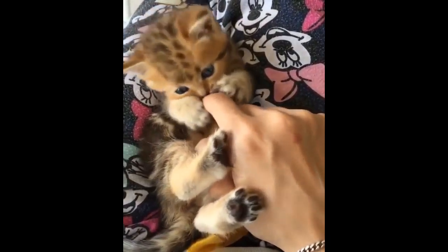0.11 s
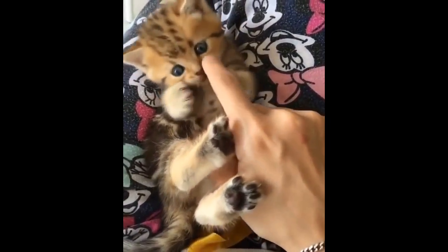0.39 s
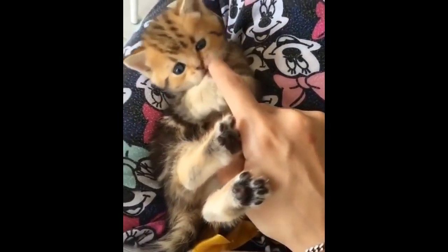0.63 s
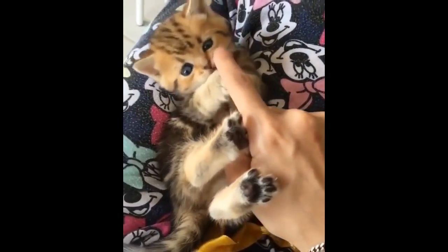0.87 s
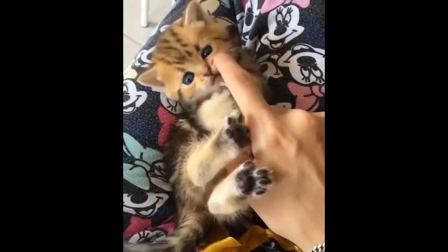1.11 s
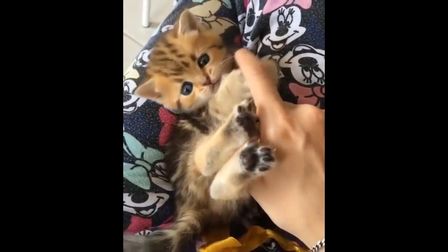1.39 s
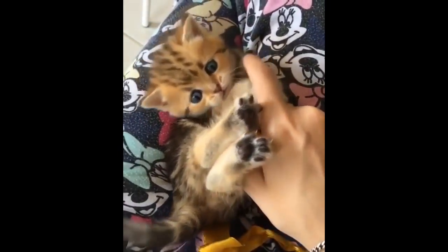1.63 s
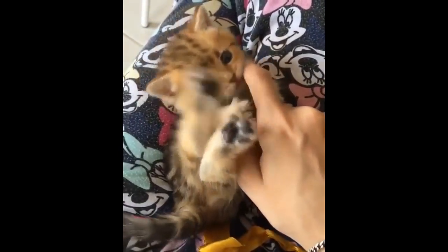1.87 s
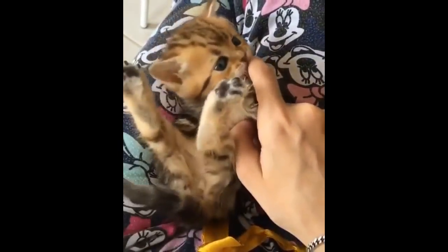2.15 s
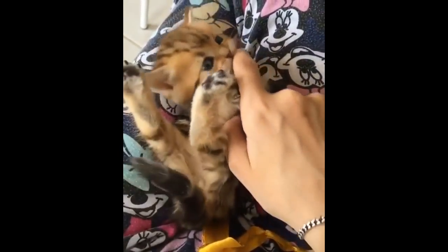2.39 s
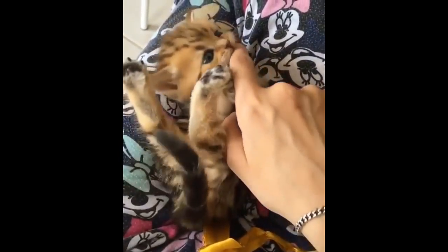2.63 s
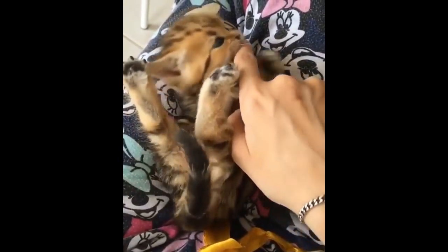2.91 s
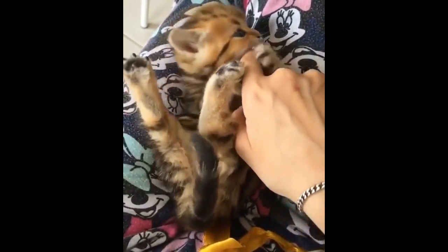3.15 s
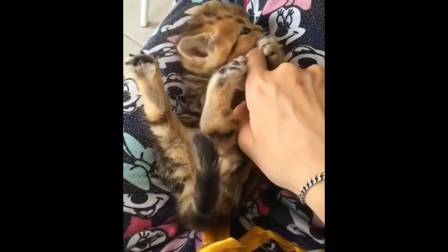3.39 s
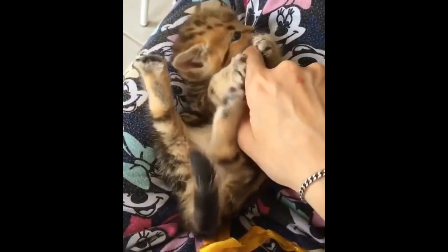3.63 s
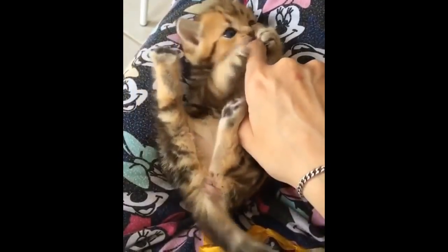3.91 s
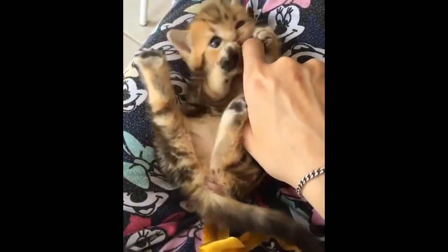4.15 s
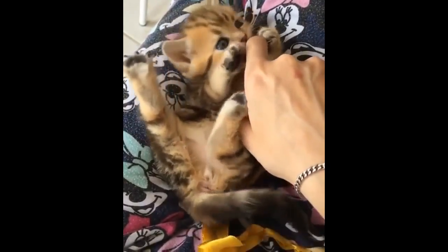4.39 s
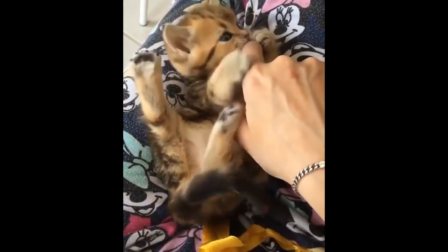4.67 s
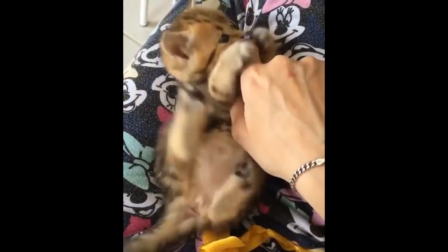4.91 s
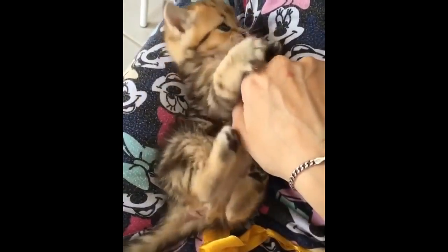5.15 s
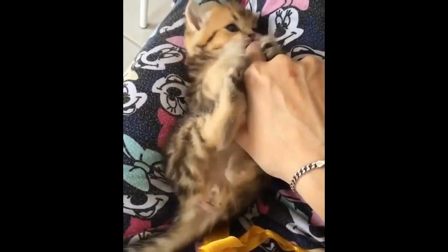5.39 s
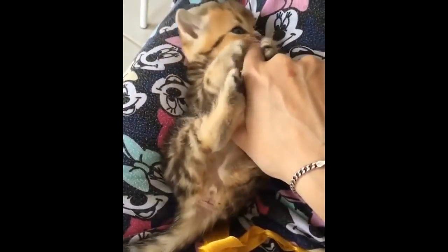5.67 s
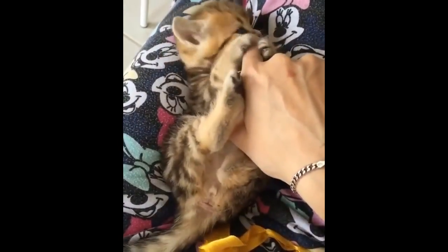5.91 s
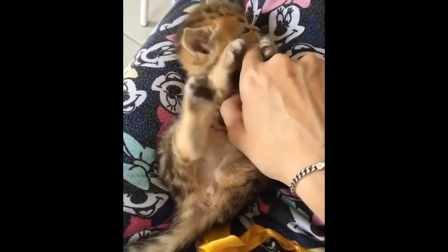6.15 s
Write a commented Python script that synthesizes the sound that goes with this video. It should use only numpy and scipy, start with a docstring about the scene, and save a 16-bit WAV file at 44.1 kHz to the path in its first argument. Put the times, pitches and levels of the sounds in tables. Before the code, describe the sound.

A dark, bassy drone wavers continuously, almost like a rough purr, with uneven pulses and a soft rumble coloured by the room. Quiet hiss sits behind. Early on come two small claw clicks, then a sharper tick near 2.4 seconds and a duller scratch near 3.3, with soft fur rubs around them. Later only gentle brushing and a slightly growing motor whine remain. Indoor, mono, dull at the very top.

```python
"""Kitten on a lap, appliance drone

A kitten plays in a quiet room; what is heard is mostly the low drone of an appliance with a fan.
Narrow bands of low hum noise, each drawn as a sine of irregular level and pitch, lie beside lines on
multiples of the mains; the rumble is noise through the room's standing waves. Air is faint noise; fur
is clumped noise brushing on cloth, and claws now and then tick as snaps inside short noise bursts."""
import sys
import numpy as np
from scipy import signal
from scipy.fft import rfft, irfft, next_fast_len
from scipy.io import wavfile
from scipy.ndimage import uniform_filter1d, map_coordinates

SR = 44100
rng = np.random.default_rng(int(sys.argv[2]) if len(sys.argv) > 2 else 0)


def log_audio(samples):
    """Write samples as a 16-bit WAV file to the path given in sys.argv[1]."""
    # one column per channel
    frames = np.atleast_2d(samples).T
    # limit to full scale, then quantise
    limited = np.clip(frames, -1, 1)
    pcm = np.round(limited * 32767).astype(np.int16)
    wavfile.write(sys.argv[1], SR, pcm)


def ratio_of_db(decibels):
    """Turn decibels (scalar or array-like) into linear amplitude factors; 0 dB maps to 1."""
    return 10 ** (np.asarray(decibels, float) / 20)


N = 277589

# low hum bands: f/Hz, rest level/dB (scaled in varying), wander/Hz, flutter/dB, waver/Hz
DRONE_BANDS = [(53.46, -59, 2.55, 4, 1.97), (102, -54.5, 0.92, 1.5, .9), (125, -54, 6, 3.5, 2.5)]
# motor overtones, whine last: f/Hz, waver/Hz, flutter/dB, power share of pure tone/0-1
OVERTONES = [(151, 2.5, 2.5, .25), (203, 4.5, 2.5, .4), (251.5, 2.5, 2.5, .15), (842, 13, 3, .05)]


def unit(x):
    """Scaled to rms 1."""
    return x / np.sqrt(np.mean(x ** 2) + 1e-20)


def curves(rows):
    """One value per sample for each column after the time."""
    knot_s, *columns = np.transpose(rows)
    return [np.interp(np.arange(N) / SR, knot_s, column) for column in columns]


def wobble(knots_per_s):
    """A smooth random curve through normal random knots."""
    knots = rng.standard_normal(int(N * knots_per_s / SR) + 4)
    return map_coordinates(knots, [np.arange(N) * knots_per_s / SR])


def noise(gain):
    """Noise of rms 1 with the given gain over frequency."""
    size = next_fast_len(N)
    white = rfft(rng.standard_normal(size))
    return unit(irfft(white * gain(np.fft.rfftfreq(size, 1 / SR)), size)[:N])


def spectrum(points):
    """Gain over frequency from (f/Hz, level/dB) points on a log axis."""
    hz, db = np.transpose(points)
    return lambda f: ratio_of_db(np.interp(np.log(f + 1), np.log(hz + 1), db, -120, -120))


def peak(f, hz, width_hz):
    """Power response of one resonance, steep enough to leave dark valleys."""
    return 1 / (1 + ((f - hz) / (width_hz / 2)) ** 2) ** 2


def ragged(f, step_hz):
    """A fixed random curve over frequency: the many overlapping reflections of a room."""
    return map_coordinates(rng.standard_normal(int(f[-1] / step_hz) + 4), [f / step_hz])


def tone(hz):
    """A sine of rms 1 along a pitch curve."""
    cycles = np.cumsum(hz + np.zeros(N)) / SR
    return np.sqrt(2) * np.sin(2 * np.pi * (cycles + rng.random()))


def varying(hz, rest_db, rest_hz):
    """Gain and pitch of one narrow band: a drifting rest, with louder stretches that draw its pitch."""
    # louder stretches of the narrow-band hum, each on the band nearest its pitch:
    # start/s, length/s, pitch/Hz, added level at top/dB
    louder_stretches = [(0.402, 0.3, 52.9, -45.5), (.8, 0.25, 56, -52), (1.03, .45, 52, -51.5),
                        (1.847, 0.45, 55.5, -47), (2.552, 0.42, 51.6, -48), (3.024, 0.42, 50.48, -51),
                        (3.38, 0.39, 50.5, -49), (4.097, .15, 57.03, -48), (4.422, .45, 51, -46.5),
                        (4.917, 0.46, 50.7, -54), (5.49, 0.76, 50.1, -49), (-.06, 0.27, 102.5, -44),
                        (.14, 0.55, 102.2, -41.5), (0.55, 0.48, 99.7, -41), (0.953, .28, 102, -46),
                        (1.176, 0.26, 102.2, -38), (1.448, 0.39, 99.54, -43), (1.83, 0.22, 103.4, -47.5),
                        (2.024, 0.32, 101.4, -39), (2.27, 0.27, 101.3, -45), (2.693, 0.25, 104.2, -40.5),
                        (3.003, .35, 101.1, -39.5), (3.22, .35, 101.3, -39), (3.6, 0.4, 100.6, -44),
                        (3.97, 0.23, 101.8, -46), (4.33, .32, 102, -40), (4.579, 0.3, 101.4, -42.5),
                        (5.14, 0.31, 102.7, -45), (5.5, 0.22, 101.1, -44.5), (5.763, 0.17, 102.7, -44),
                        (6.005, 0.51, 102, -45.5), (.18, 0.18, 120.4, -44.5), (0.779, .22, 129, -44),
                        (1.08, 0.25, 128, -43.5), (1.851, 0.23, 122, -50), (2.579, 0.25, 125, -47),
                        (2.929, .17, 127.3, -46), (3.139, 0.12, 121.5, -44.5), (3.578, 0.23, 126.5, -43),
                        (4.971, 0.15, 127.2, -41), (5.341, 0.14, 128, -46), (4.72, .16, 126.1, -46),
                        (5.58, .15, 129.8, -44.5), (5.76, 0.31, 127.7, -46), (6.097, .1, 131.7, -45.5),
                        (.29, .28, 150.5, -48.5), (0.603, .17, 151.5, -49.5), (1.696, 0.19, 150.9, -50),
                        (1.023, 0.23, 151.4, -46), (2.483, .38, 151.4, -45.5), (3.03, 0.45, 151, -49.5),
                        (3.903, 0.83, 150.1, -53.5), (4.937, 0.59, 151, -52.5), (5.48, .25, 151.2, -50),
                        (5.912, .34, 152.1, -46), (.35, .5, 203, -56.5), (2.2, .3, 203.8, -54.5),
                        (2.63, .3, 202.8, -53.5), (3.3, .35, 203, -53.5), (4.549, 0.38, 203.1, -56.5),
                        (5.05, 0.32, 203, -55), (.28, 0.14, 251.3, -57.5), (2.8, 0.21, 249.2, -55),
                        (5.001, .25, 250.7, -57.5), (5.85, .27, 250.9, -57), (3.201, 0.37, 251.5, -49),
                        (4.508, 0.33, 251.5, -53.5), (5.38, .4, 251.4, -56)]
    pointedness = 0.719  # small = flat-topped, large = pointed
    drifting_db = rest_db + 3 * wobble(4)
    power = ratio_of_db(2.028 * drifting_db)  # 2 would be plain power: rest dB count 1.014-fold
    pull = power * rest_hz
    bands_hz = np.array([row[0] for row in DRONE_BANDS + OVERTONES])
    for start_s, length_s, pitch_hz, top_db in louder_stretches:
        if bands_hz[np.argmin(abs(bands_hz - pitch_hz))] != hz:
            continue
        first = max(round(start_s * SR), 0)
        last = min(round((start_s + length_s) * SR), N)
        at = np.arange(first, last)
        arch = abs(np.sin(np.pi * (at / SR - start_s) / length_s))
        lift = ratio_of_db(2 * top_db) * arch ** (2 * pointedness)
        power[at] += lift
        pull[at] += lift * pitch_hz
    return np.sqrt(power), pull / power  # pitch is the power-weighted mean


def drone():
    """Three narrow bands of low hum noise, each drawn as a sine whose level and pitch vary irregularly."""
    out = np.zeros(N)
    for hz, rest_db, wander_hz, flutter_db, waver_hz in DRONE_BANDS:
        gain, pitch = varying(hz, rest_db, hz + wander_hz * wobble(6))
        flutter = ratio_of_db(flutter_db * wobble(13))
        out += gain * unit(flutter * tone(pitch + waver_hz * wobble(11)))
    return out


def motor():
    """Each overtone is a pure mains line beside a wavering, fluttering sine; the whine sets in and grows."""
    # steady lines: multiple of the mains, level/dB
    steady = [(6, -66), (10, -86)]
    # third to fifth overtone: rest level/dB (scaled in varying)
    overtone_rest_db = [-58, -59, -64.5]
    # whine: t/s, rest level/dB (scaled in varying)
    whine = [(0, -75.5), (1.75, -78), (1.82, -69.5), (3.5, -70.5), (4.1, -67.5), (5.2, -65.5),
             (6.29, -64.5)]
    mains_hz = 50
    out = np.zeros(N)
    for multiple, db in steady:
        out += ratio_of_db(db + 1.1 * wobble(2.53)) * tone(multiple * mains_hz)
    rests_db = overtone_rest_db + curves(whine)
    for rest_db, (hz, waver_hz, flutter_db, pure) in zip(rests_db, OVERTONES):
        gain, pitch = varying(hz, rest_db, hz)
        line = tone(round(hz / mains_hz) * mains_hz)
        flutter = ratio_of_db(flutter_db * wobble(3 * waver_hz))
        loose = unit(flutter * tone(pitch + waver_hz * wobble(3 * waver_hz)))
        out += gain * (np.sqrt(pure) * line + np.sqrt(1 - pure) * loose)
    return out


def rumble():
    """Broad fan rumble, strong where the room resonates; its upper resonances drift in level."""
    # standing waves and casing resonances: f/Hz, -6 dB width/Hz, relative level/dB
    resonances = [(28, 18, -15), (57.4, 6.5, -3), (69, 17, 1.5), (101.6, 6.5, -1.5), (122, 18, 0),
                  (166.5, 8.9, -7.5), (181.4, 13.5, -3.5), (229, 15, -12.5), (262, 10, -7.5),
                  (281.3, 14, -7), (301.8, 6.2, -2), (321, 20, -9.5), (351.7, 6.9, -4), (366.1, 9.9, -4.5),
                  (375.8, 8.3, -9), (396, 14, -11), (414.6, 10, -12), (438, 17, -24), (504, 24, -24),
                  (578.6, 6.5, -12.5), (601.6, 15, -22), (630.5, 12, -22), (897, 16, -20.5),
                  (1071, 10, -28), (1317, 24, -27), (1683, 20, -28.5), (1873, 18, -27), (2147, 23, -29),
                  (2300, 10, -30), (3720, 7, -29.5)]
    # rumble between the resonances: f/Hz, relative density level/dB
    between = [(13, -69), (22, -27.5), (117, 4.5), (248, -10.5), (377, -15), (466, -38.5), (583, -25.5),
               (688, -35.5), (800, -28.5), (1040, -38), (1760, -120)]
    split_hz = 311

    def ring(low_hz, high_hz):
        """Noise of rms 1 through the resonances between two limits."""
        chosen = [row for row in resonances if low_hz < row[0] < high_hz]
        return noise(lambda f: np.sqrt(sum(ratio_of_db(2 * db) * peak(f, hz, width) for hz, width, db in chosen)))

    lower = ratio_of_db(-52) * ring(0, split_hz)
    upper = ratio_of_db(-57.5 + wobble(5)) * ring(split_hz, SR)
    return lower + upper + ratio_of_db(-54) * noise(spectrum(between))


def brush_strokes():
    """Each stroke of fur on cloth rises fast and fades slower: (envelope, fur dB, air lift dB)."""
    # t/s, fade time constant/s, fur level/dB, lift of the air hiss/dB
    brushes = [(1.12, 0.16, -92, 1.5), (1.78, 0.091, -84, 2.5), (1.85, .12, -75, 0),
               (2.366, 0.033, -76, -4), (3.16, .06, -73, 1), (3.279, 0.053, -76, 7), (3.75, 0.21, -79, -2),
               (4.15, .12, -82, 1), (4.5, .25, -80, -0.5), (4.95, .15, -81, 1.5), (5.5, 0.079, -78, -0.5)]
    rise_over_fade = 0.15
    t = np.arange(N) / SR
    strokes = []
    for s, fade_s, fur_db, lift_db in brushes:
        age = np.where(t < s, (s - t) / (rise_over_fade * fade_s), (t - s) / fade_s)
        strokes.append((np.exp(-age), fur_db, lift_db))
    return strokes


def air_hiss(strokes):
    """Air noise combed by the room, heard with a fine flicker; strokes raise or lower its level."""
    # air noise: f/Hz, relative density level/dB
    air_colour = [(300, -32), (450, -2.5), (600, -6), (780, -5.5), (960, -7), (1600, -8.5), (2190, -8.5),
                  (3080, -19.5), (3900, -18), (4600, -18.5), (4900, -23), (5300, -19), (7650, -27.5),
                  (9700, -27.5), (10400, -31), (11300, -27.5), (13900, -30.5)]
    t = np.arange(N) / SR
    level_db = -63.5 + 0.16 * (t - t.mean()) + 0.3 * wobble(2.908)  # grows 0.16 dB/s
    level_db += sum(envelope * lift_db for envelope, _, lift_db in strokes)
    colour = spectrum(air_colour)
    combed = noise(lambda f: colour(f) * ratio_of_db(2.2 * ragged(f, step_hz=21.94)))
    z = signal.stft(combed, nperseg=1024)[2]
    flicker = uniform_filter1d(rng.standard_normal(z.shape), size=2, axis=0)  # 2 bins
    flicker = uniform_filter1d(flicker, size=4, axis=1)  # 4 frames
    flickering = signal.istft(z * ratio_of_db(3.19 * unit(flicker)), nperseg=1024)[1][:N]
    return ratio_of_db(level_db) * unit(flickering)


def fur(strokes):
    """Fur brushing cloth: noise in short random clumps, rising over a faint rest with each stroke."""
    # fur noise: f/Hz, relative density level/dB
    fur_colour = [(1500, -120), (2500, -3), (5000, 4.5), (9000, -2.5), (14000, -6), (15000, -120)]
    rubbing = ratio_of_db(-84.5) + sum(envelope * ratio_of_db(db) for envelope, db, _ in strokes)
    clumps = ratio_of_db(1.2 * wobble(45) + 2.5 * wobble(400))
    return rubbing * unit(clumps * noise(spectrum(fur_colour)))


def claws():
    """Each tick is a snap ringing at its own pitch inside a short burst of noise."""
    # t/s, level/dB (ahead of the burst and snap gains), pitch/Hz, width/Hz, t60/s
    ticks = [(1.2027, -50, 4200, 1500, .01), (1.5644, -50, 12300, 3000, .014),
             (1.8466, -54, 6800, 2500, .04), (1.856, -62, 9500, 4000, .03), (2.3641, -38, 5000, 1700, .009),
             (2.3638, -49, 11500, 4000, .007), (2.3714, -58, 6000, 3500, .015),
             (3.277, -54, 2300, 2600, .12), (3.2775, -53, 7000, 8000, .014)]
    out = np.zeros(N)
    t = np.arange(4096) / SR
    f = np.fft.rfftfreq(len(t), 1 / SR)
    for s, db, hz, width_hz, t60_s in ticks:
        white = rfft(rng.standard_normal(len(t)))
        burst = unit(irfft(white * np.sqrt(peak(f, hz, width_hz))))
        snap = np.sin(2 * np.pi * hz * t) * np.exp(-t * width_hz * 0.8)
        shape = ratio_of_db(-60 * t / t60_s) * (1 - np.exp(-t / 0.0005))  # 0.5 ms onset
        out[round(s * SR):][:len(t)] += ratio_of_db(db) * shape * (0.4 * burst + 1.5 * snap)
    return out


def scene():
    """All sources at one microphone."""
    strokes = brush_strokes()
    return (drone() + motor() + rumble() + air_hiss(strokes) + fur(strokes) + claws())[None]


def top_cut(x):
    """Nothing passes above the cut-off."""
    return signal.sosfilt(signal.butter(12, 14270, fs=SR, output="sos"), x)


def record(dry):
    """A phone keeps nothing above its band limit."""
    top_hz = 13950
    size = next_fast_len(N)
    passed = np.fft.rfftfreq(size, 1 / SR) < top_hz
    kept = irfft(rfft(dry, size) * passed, size)[:, :N]
    return top_cut(kept)


dry = scene()
out = record(dry)
log_audio(out)
```